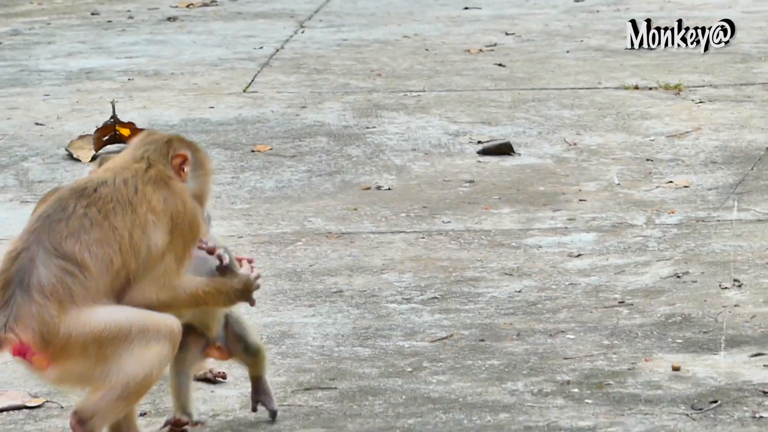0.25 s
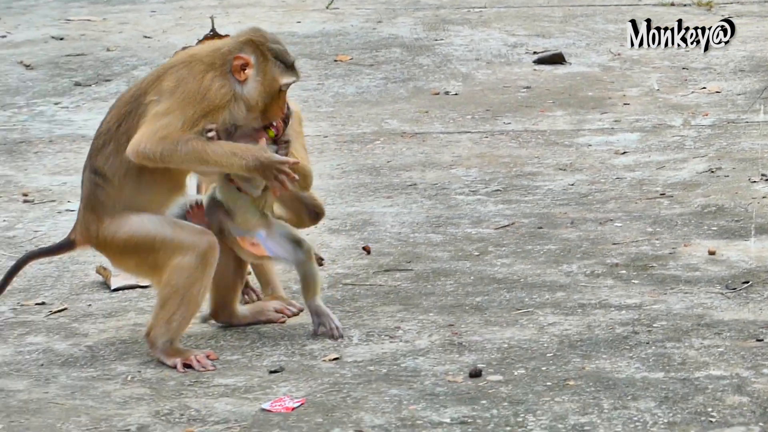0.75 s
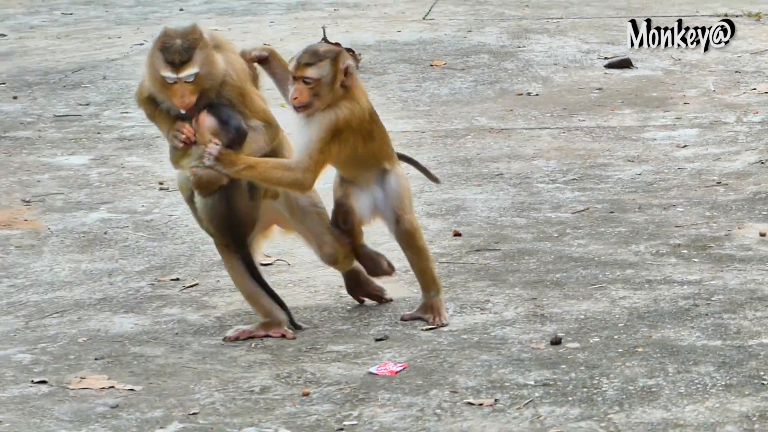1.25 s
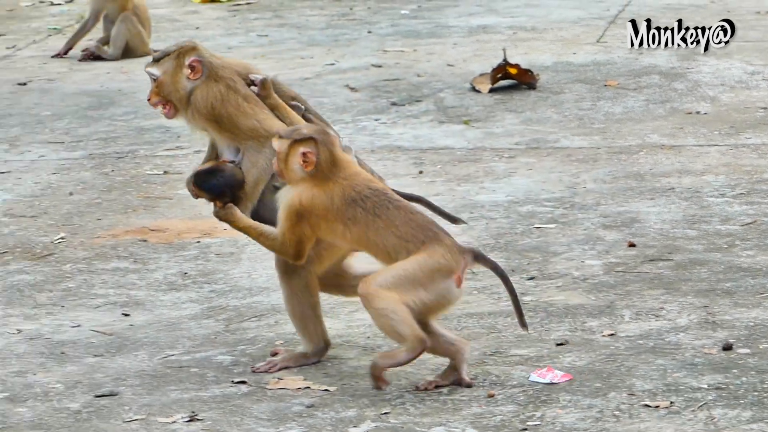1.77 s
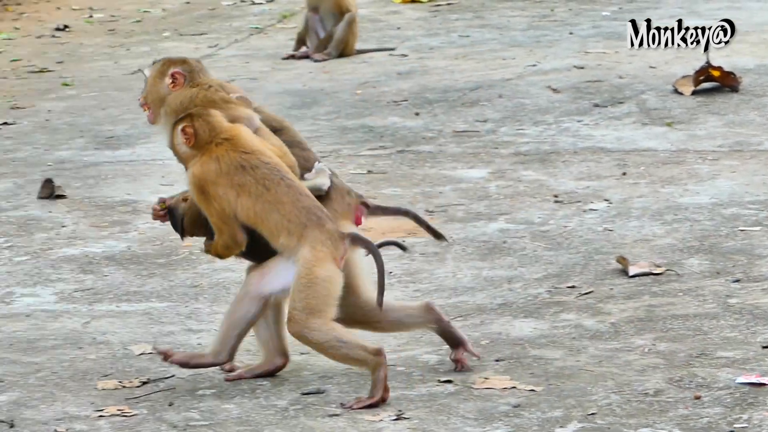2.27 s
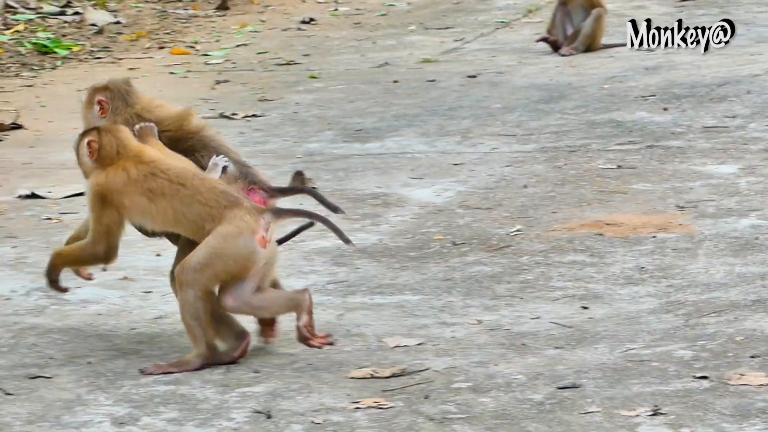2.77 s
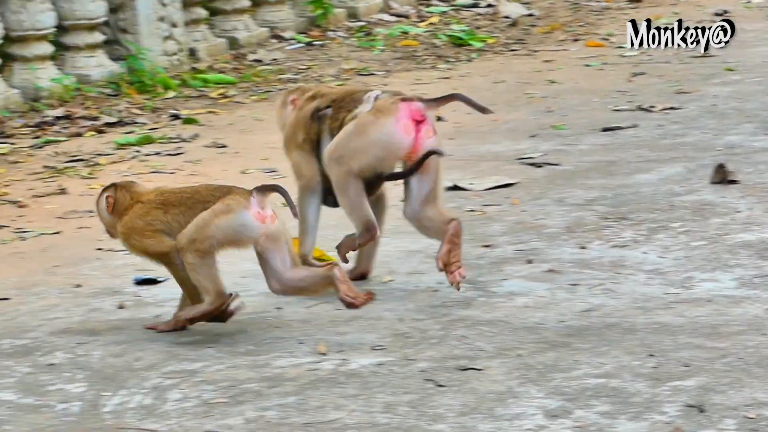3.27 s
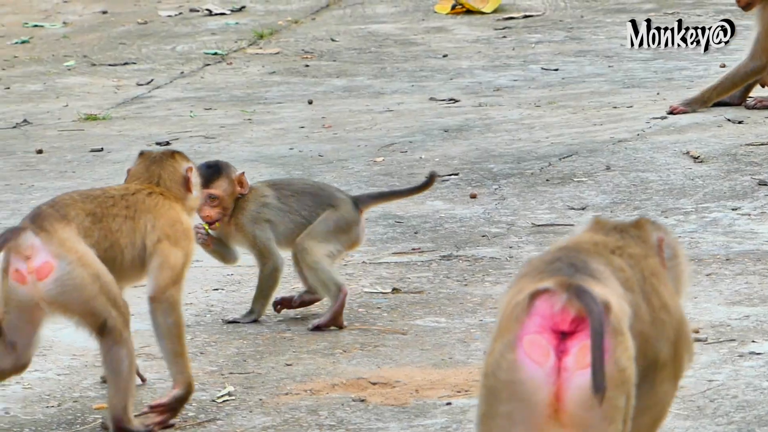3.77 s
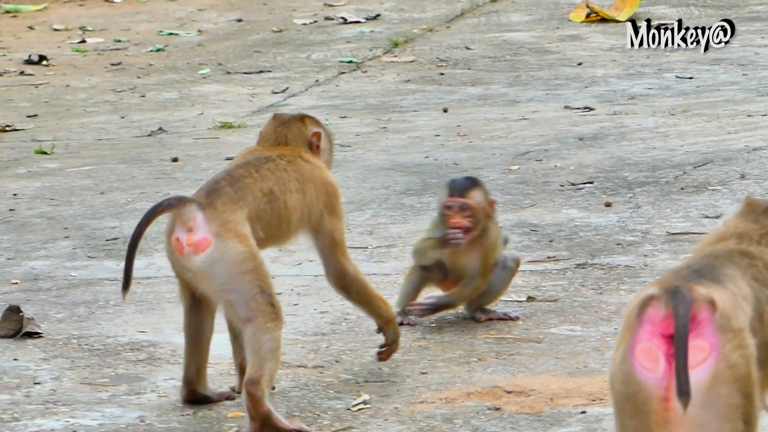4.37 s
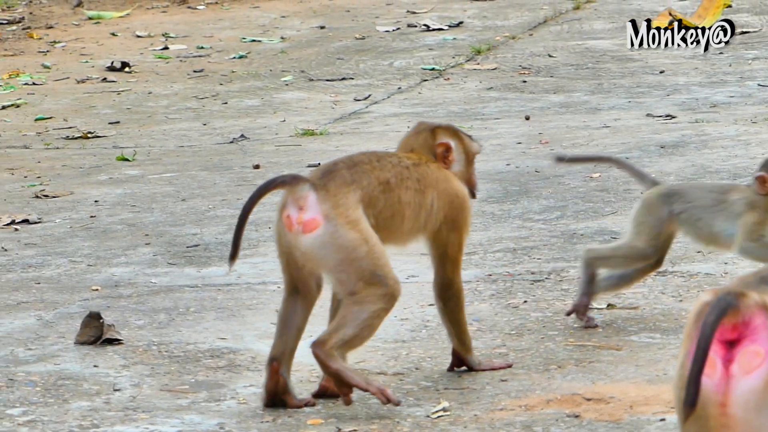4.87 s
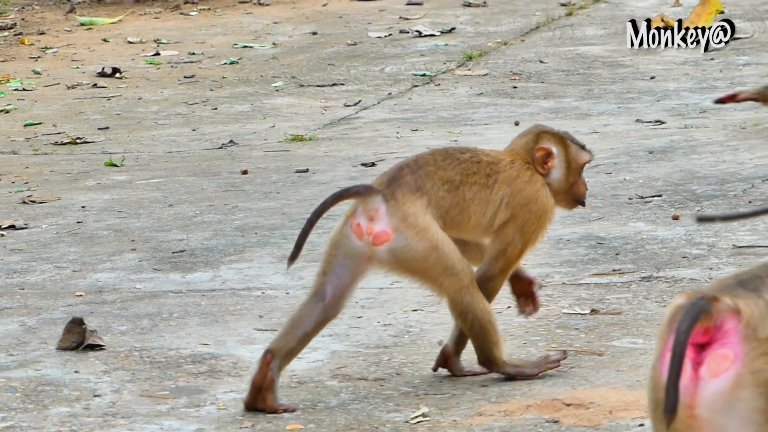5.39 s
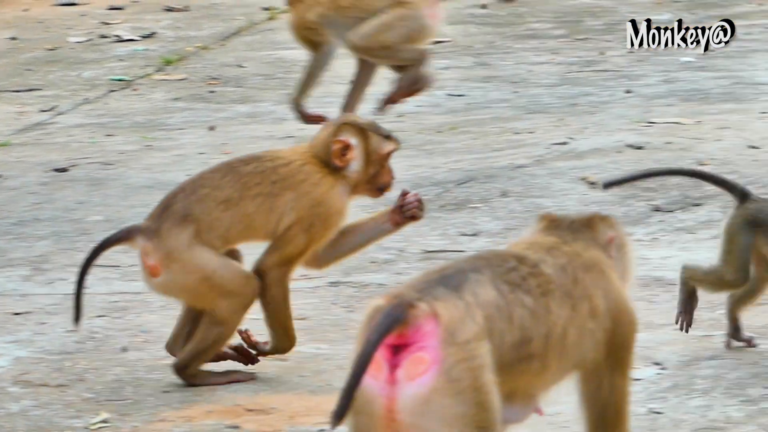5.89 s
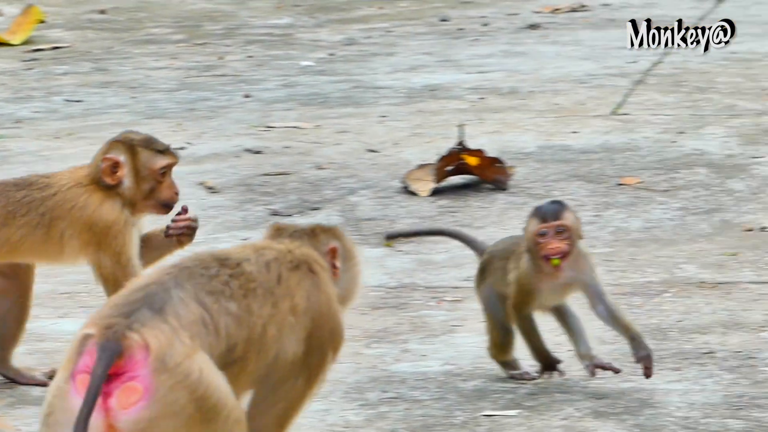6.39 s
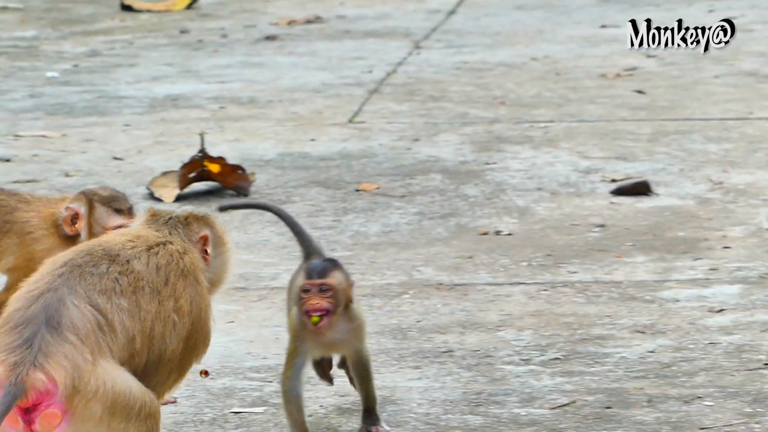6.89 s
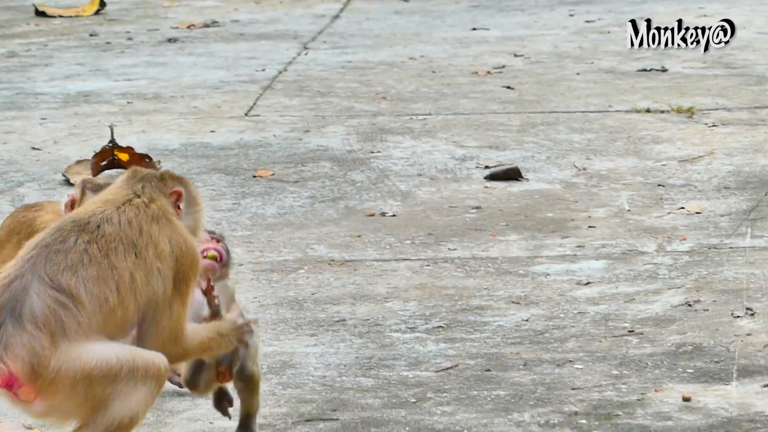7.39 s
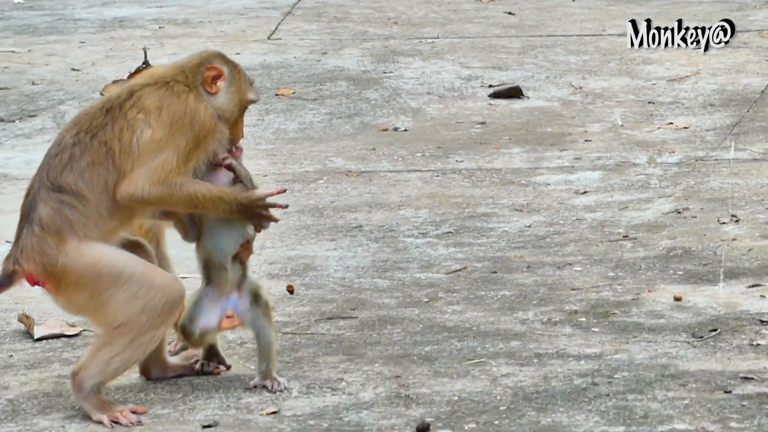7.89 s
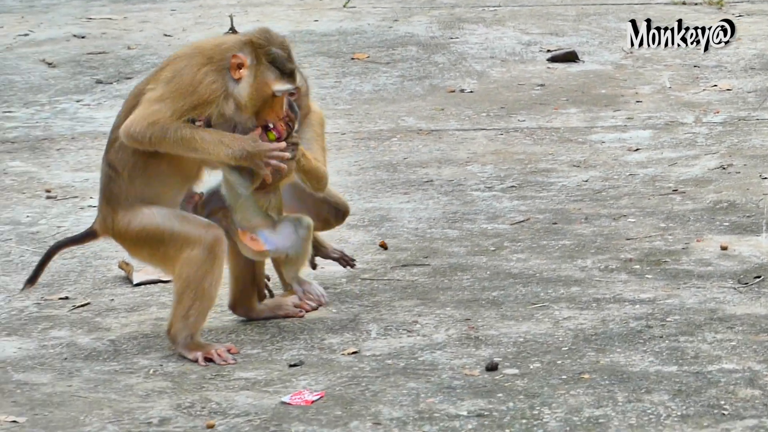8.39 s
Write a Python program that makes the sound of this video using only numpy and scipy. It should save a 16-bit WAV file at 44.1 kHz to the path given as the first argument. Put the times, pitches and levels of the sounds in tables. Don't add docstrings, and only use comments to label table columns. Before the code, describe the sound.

A small monkey screams on a paved yard with a short, patchy echo. Wind buffets the microphone with low thumps at 0-0.15 s, while a shrill scream bursts out at 0.1 and falls into rasp by 0.25. A thin high yelp follows at 0.8, a rough short scream at 1.0, a tiny chirp at 1.27 and a loud, hoarse, noisy scream at 1.3-1.5. Feet scuff and tap between 1.7 and 3.45, sharpest at 2.44; a faint far squeak comes at 2.15. Rumble, distant traffic, motor hum and insect hiss continue. At 3.54 everything becomes quieter, duller and slowed. A faint wavering squeal holds at 4.0-4.3, a double-arched one at 4.65-4.87, then soft scuffs near 5.1. The background calms further at 6.1; a clear squeal rises slightly and sinks at 6.7-6.9. From 7.14 the opening repeats slowed, softer and deeper: stretched scream at 7.3, yelp at 8.3, another scream from 8.6.

```python
import sys
import numpy as np
from scipy import signal
from scipy.fft import rfft, irfft
from scipy.io import wavfile
from scipy.ndimage import uniform_filter1d

SR = 44100
rng = np.random.default_rng(int(sys.argv[2]) if len(sys.argv) > 2 else 0)


def store_wav(level_fs):
    pcm = np.round(np.clip(np.atleast_2d(level_fs), -1, 1) * 32767)
    wavfile.write(sys.argv[1], SR, pcm.T.astype(np.int16))


def gain_from_db(level_db):
    decades = np.asarray(level_db, float) / 20
    return 10 ** decades


N = 381461
TIME, HZ = np.arange(N) / SR, np.arange(N // 2 + 1) * SR / N + 1e-3
SLOW = 2 / 3


def rms_one(x):
    return x / np.sqrt(np.mean(x ** 2) + 1e-20)


def at_hz(points, hz):
    x, y = np.array(points).T
    return np.interp(np.log(hz), np.log(x), y)


def drift(rate, size=N):
    r = np.exp(-2 * np.pi * rate / SR)
    settle = SR // 2
    noise = rng.standard_normal(size + settle)
    return rms_one(signal.lfilter([1], [1, -2 * r, r * r], noise)[settle:])


def resonance(x, hz, width_hz):
    r = np.exp(-np.pi * width_hz / SR)
    poles = [1, -2 * r * np.cos(2 * np.pi * hz / SR), r * r]
    return signal.lfilter((1 - r * r) / 2 * np.array([1, 0, -1]), poles, x)


# (frequency [Hz], correlation [0-1])
LIKENESS = [(60, 0.95), (120, 0.8), (250, 1), (510, 0.61), (1050, 0.22), (2150, 0.8), (4390, 0.76),
            (8990, 0.21)]
# (frequency [Hz], level [dB])
LEAN = [(60, 3), (100, -3), (180, -0.5), (320, -3), (560, -2.5), (970, -0.5), (1690, 0), (2950, 0.5),
        (5150, 1), (8990, 0.0)]
# (frequency [Hz], phase [rad])
LEAD = [(0, 0), (260, -0.92), (1120, 0.4), (1640, 0.085), (2150, 0.77), (3010, 0.0), (5000, -0.21),
        (5430, -0.2), (5860, 0.038), (6120, -0.3), (6370, 0.4), (7490, -0.38), (8010, 0.22), (9130, -0.0)]


def stereo_noise(gain, speed):
    mid, side = rfft(rng.standard_normal((2, N))) * gain
    hz = HZ / speed
    alike = np.clip(at_hz(LIKENESS, hz), 0, 1)
    lean = gain_from_db(at_hz(LEAN, hz) / 2)
    lean = lean * np.exp(.5j * at_hz(LEAD, hz))
    pair = np.sqrt(1 + alike) * mid + np.sqrt(1 - alike) * side * [[1], [-1]]
    return rms_one(irfft(pair * [lean, 1 / lean], N))


# (start [s], rumble [dB], traffic [dB], hiss [dB])
SHOTS = [
    (0, -48, -54.5, -57.5),
]
SLOW_SHOTS = [
    (3.54, -59, -63, -68),
    (6.1, -62, -71.5, -72),
]
# (time [s], level [dB], half width [s])
GUSTS = [
    (0, 17.5, 0.029),
    (.095, 15, 0.036),
    (.19, -8, 0.12),
    (.56, 4, 0.035),
    (2.23, 2.5, 0.14),
    (2.49, 7.5, 0.02),
    (2.769, 0, 0.042),
    (3.36, 4, .12),
]
SLOW_GUSTS = [
    (4.34, -3, 0.044),
    (4.7, 7, 0.048),
    (5.75, -3, 0.037),
    (6.03, 0.5, 0.096),
    (6.29, 2, .04),
    (6.68, 1.5, 0.085),
    (7.161, 7, 0.35),
]


def weather(shots, gusts):
    start, *levels = np.transpose(shots)
    shot = np.clip(np.searchsorted(start, TIME) - 1, 0, None)
    rumble_db, traffic_db, hiss_db = (level[shot] for level in levels)
    wind_db = sum(db * np.exp(-((TIME - at) / width) ** 2) for at, db, width in gusts)
    return rumble_db + wind_db, traffic_db + .15 * wind_db, hiss_db + .081 * wind_db


# (frequency [Hz], density [dB per Hz])
AIR_COLOUR = [(15, -41.5), (25, -21.5), (71, 0), (182, -2.5), (307, -10), (393, -9), (808, -16),
              (938, -13.5), (1090, -16.5), (1170, -15.5), (2870, -22.5), (3860, -22), (4590, -28),
              (6500, -25), (9440, -34.5), (12300, -59), (20800, -120)]


def air(levels, speed, hum_db, insect_db):
    hz = HZ / speed
    insects = np.exp(-((hz - 6500) / 450) ** 2)
    motor = np.exp(-((hz - 180.3) / 7.8) ** 2)
    out = gain_from_db(insect_db) * stereo_noise(insects, speed)
    out += gain_from_db(hum_db) * stereo_noise(motor, speed)
    low, high = 1 / (1 + (hz / 240) ** 6), 1 / (1 + (720 / hz) ** 6)
    shares = low, 1 - low - high, high
    for share, level_db, gust_db in zip(shares, levels, (1.5, .8, .6)):
        colour = gain_from_db(at_hz(AIR_COLOUR, hz)) * np.sqrt(np.clip(share, 0, 1))
        out += gain_from_db(level_db + gust_db * drift(12.0)) * stereo_noise(colour, speed)
    return out


# (time [s], peak level [dB], ring frequency [Hz])
KNOCKS = [
    (0.0, -33, 61),
    (0.05, -26.5, 96),
    (0.074, -20.5, 125.7),
    (0.097, -21, 138),
    (0.112, -27.5, 102),
    (3.341, -34, 83.3),
    (3.453, -28.5, 107),
]
SLOW_KNOCKS = [
    (7.005, -45.5, 74),
    (7.029, -39, 40.4),
    (7.109, -47, 61.7),
    (7.124, -32.5, 56.5),
]


def knocks(rows):
    out, t = np.zeros(N), TIME[:SR // 10]
    for s, peak_db, hz in rows:
        swing = np.sin(2 * np.pi * hz * t) * np.exp(-(t * hz / 0.69) ** 2)
        out[round(s * SR):][:len(t)] += gain_from_db(peak_db + 3.5) * swing
    out = signal.sosfilt(signal.butter(2, 55.0, "high", fs=SR, output="sos"), out)
    later = np.interp(TIME - .0012, TIME, out)
    return np.array([out, later]) * gain_from_db([[-1.5], [1.5]])


# (time [s], peak level [dB], centre frequency [Hz],
# t60 [s])
STEPS = [(.946, -43, 3400, 0.048), (1.69, -36, 6950, 0.016), (1.7, -38, 7000, 0.14),
         (2.1, -38.5, 500, 0.33), (2.441, -26.5, 1383, 0.04), (2.454, -37, 6500, 0.055),
         (2.917, -40, 945, 0.092), (2.98, -38, 7000, 0.075), (2.997, -34, 6500, 0.19),
         (3.144, -32.5, 2730, 0.036), (3.21, -38, 5000, 0.082), (3.23, -40, 3880, 0.18),
         (3.45, -44, 5540, 0.23)]
SLOW_STEPS = [
    (5.075, -53, 2260, .05),
    (5.15, -47, 450, .1),
    (5.174, -45, 2310, .06),
]


def steps(rows):
    out, t = np.zeros((2, N)), TIME[:SR // 4]
    for s, peak_db, hz, t60 in rows:
        grains = rng.standard_normal((2, len(t))) + 1.4 * rng.standard_normal(len(t))
        grit = rms_one(resonance(grains, hz, 0.63 * hz))
        envelope = gain_from_db(peak_db - 13.0 - 60 * t / t60) * np.clip(t / 0.0022, 0, 1)
        out[:, round(s * SR):][:, :len(t)] += envelope * grit
    return out


# (frequency [Hz], t60 [s])
YARD = [(1000, 0.7), (2500, 0.85), (5000, 0.65), (9000, 0.57)]


def yard(x, speed):
    t, echo = TIME[:2 * SR] * speed, 0
    noise = stereo_noise(1 + 0 * HZ, speed)[:, :2 * SR]
    edges = 700 * 2 ** np.arange(0, 4.1, .5)
    for low, high in zip(edges, edges[1:]):
        half_octave = signal.butter(2, [low * speed, high * speed], "band", fs=SR, output="sos")
        t60 = at_hz(YARD, np.sqrt(low * high))
        echo = echo + signal.sosfilt(half_octave, noise) * gain_from_db(-60 * t / t60)
    wall_db = 1.7 * np.exp(-((t - .055) / 0.051) ** 2)
    patchy_db = 2.1 * drift(25.0, len(t))
    echo = echo * np.clip(t / 0.0049, 0, 1) * gain_from_db(wall_db + patchy_db)
    echo = echo / np.sqrt(np.sum(echo ** 2) / 2)
    return signal.fftconvolve(x[None], echo, axes=1)[:, :N]


# (pitch at full speed [Hz], lift [dB])
UNDERTONE = [(2050, 6.5), (2400, 6.5), (2750, -0.5), (3000, -8.5), (3400, -12)]


def voicing(rows, octave_db, quarter_db, speed, t):
    s, *columns = np.transpose(rows)
    pitch, effort_db, disorder_db = (np.interp(t, s, c) for c in columns)
    whistle_db = effort_db - 10 * np.log10(1 + 10 ** (disorder_db / 10))
    rasp_db = whistle_db + disorder_db
    age = (t - t[0]) * speed
    octave_db = whistle_db + octave_db - 11 * np.exp(-age / .01) - 9.5 * gain_from_db(2 * (rasp_db - effort_db))
    quarter_db = rasp_db + quarter_db - 16 * np.exp(-age / .024)
    before_top = np.arange(len(t)) < np.argmax(pitch)
    slack_hz = np.where(before_top, pitch.max(), pitch) / speed
    return pitch, whistle_db, octave_db, quarter_db, rasp_db, at_hz(UNDERTONE, slack_hz)


# (frequency [Hz], gain [dB])
THROAT = [(900, -36), (1200, -17), (1450, -15), (1750, -3), (2100, -5.5), (2500, -3.5), (2900, -2),
          (3300, -5), (4000, -13), (5600, -11.5), (7400, -16), (8300, -21.5), (9000, -33.5), (9600, -26)]


def squeal(rows, octave_db, quarter_db, speed):
    t = TIME[round(rows[0][0] * SR):round(rows[-1][0] * SR)]
    voices = voicing(rows, octave_db, quarter_db, speed, t)
    pitch, whistle_db, octave_db, quarter_db, rasp_db, under_db = voices

    def wander(rate):
        return drift(rate * speed, len(t))

    unrest = gain_from_db(np.clip(rasp_db - 2 - whistle_db, -40, 0))
    pitch = uniform_filter1d(pitch, round(.009 * SR / speed), mode="nearest")
    wobble = (.002 + .036 * unrest) * wander(220.0)
    phase = 2 * np.pi * np.cumsum(pitch * (1 + wobble)) / SR
    shake_db = (.6 + 2.8 * unrest) * wander(90.0)
    out = gain_from_db(whistle_db + shake_db) * np.sin(phase)
    third_db = 8.0 + 1.2 * at_hz(THROAT, 3 * pitch / speed)
    octave = np.sin(2 * phase + 5.0 * unrest ** 1.5 * wander(100.0))
    twelfth = gain_from_db(third_db) * np.sin(3 * phase)
    out += gain_from_db(octave_db + 1.5 * shake_db) * (octave + twelfth)
    effort = gain_from_db(.8 * wander(200.0))
    for k in range(2, 18):
        whole, half = k % 4 == 0, k % 4 == 2
        colour_db = at_hz(THROAT, pitch / speed * k / 4) + under_db * (k < 4) - 20.0 * (k == 2)
        colour_db = colour_db + 3.8 * (1 - unrest) * half
        slip = (.065 + .11 * unrest) * k * wander(110.0)
        line = gain_from_db(quarter_db + 3.4 * wander(61.0)) * np.sin(phase * k / 4 + slip) * (not whole)
        smear = wander(330.0) * np.sin(phase * k / 4) + wander(330.0) * np.cos(phase * k / 4)
        smear_db = rasp_db - 13.0 - 6.2 * (4.5 - unrest) * whole
        out += gain_from_db(colour_db) * (line + gain_from_db(smear_db) * effort * smear)
    edge = np.clip(np.minimum(t - t[0], t[-1] - t) / 0.0018, 0, 1)
    low_cut = signal.butter(6, 1525.0 * speed, "high", fs=SR, output="sos")
    return np.sqrt(2) * signal.sosfilt(low_cut, out) * edge


# (time [s], pitch [Hz], effort [dB], disorder as rasp over whistle [dB])
FALLING_SCREAM = [(.088, 2106, -40, -13), (.101, 2360, -27.5, -15), (.108, 2575, -22.5, -15),
                  (.114, 2940, -19.5, -11), (.14, 2966, -25.5, 0), (.175, 2770, -31, -2.5),
                  (.225, 2280, -37, -4), (.238, 2056, -33, -2.5), (.25, 1933, -50.5, -4.5)]
HIGH_YELP = [(.765, 3300, -49, -24), (.775, 3373, -31.5, -29.5), (.797, 3540, -33, -23.5),
             (.806, 3440, -28, -8), (.822, 3370, -31.5, -2.5), (.834, 3106, -26, -11.5),
             (.86, 3085, -35.5, -7.5), (.89, 3030, -46.5, -11.5)]
SHORT_SCREAM = [(.97, 2450, -40.5, -7.5), (.982, 3003, -28, -14), (1.0, 3038, -25.5, -7.5),
                (1.01, 3015, -23, -1.5), (1.025, 2913, -23.5, 4), (1.04, 2715, -27.5, 9.5),
                (1.055, 2402, -32, 5.5), (1.075, 2450, -35.5, -1), (1.1, 2364, -41.5, -2.5)]
CHIRP = [(1.262, 2950, -45, -14), (1.27, 2834, -46, -24), (1.285, 2960, -33, -14)]
HOARSE_SCREAM = [(1.279, 2900, -50, 4), (1.292, 3170, -23, 15), (1.31, 2657, -19, 19),
                 (1.35, 2292, -25, 22), (1.39, 2455, -25.5, 16), (1.425, 2356, -25, 10),
                 (1.455, 2456, -25, 7.3), (1.49, 2486, -47, 16)]
FAR_SQUEAK = [(2.144, 2670, -45.5, -24), (2.17, 2746, -45, -7), (2.19, 2674, -40, -16),
              (2.205, 2354, -46, -5), (2.215, 2030, -47.5, 3), (2.235, 2020, -54, -23)]
WAVERING_HOLD = [(4.015, 2110, -58.5, 1), (4.036, 2083, -66.5, 0.5), (4.044, 2164, -44.5, -16),
                 (4.09, 2044, -41, -15), (4.125, 2010, -42.5, -17.5), (4.165, 2103, -44, -16.5),
                 (4.21, 2164, -47.5, -16), (4.27, 2120, -40.5, -21), (4.305, 2068, -49.5, -8.5)]
DOUBLE_ARCH = [(4.652, 2030, -46, -16), (4.668, 2297, -36.5, -25.5), (4.695, 2390, -46.5, -17.5),
               (4.73, 2337, -38, -12), (4.757, 2234, -37.5, -17.5), (4.775, 2385, -64, -3.5),
               (4.795, 2410, -45.5, -7.5), (4.83, 2326, -41.5, -14.5), (4.87, 2287, -55.5, -14)]
CLEAR_ARCH = [(6.708, 1958, -55, -19.5), (6.718, 2112, -41, -20), (6.75, 2286, -36, -31),
              (6.79, 2199, -33, -28.5), (6.825, 2191, -34.5, -28), (6.87, 2072, -36.5, -29.5),
              (6.905, 1965, -37, -25.5), (6.925, 1853, -53.5, -13)]
# (course, octave over whistle [dB], quarter lines over rasp [dB],
# echo over direct [dB], more when far or turned away)
SQUEALS = [(FALLING_SCREAM, -14, 2.3, -5), (HIGH_YELP, -15.5, 8.1, -11.5), (SHORT_SCREAM, -5, -3, -11.5),
           (CHIRP, 0, -15, 4), (HOARSE_SCREAM, -5, -16, -5), (FAR_SQUEAK, -13.5, -30, 4.4)]
SLOW_SQUEALS = [(WAVERING_HOLD, -8.5, -6, -7), (DOUBLE_ARCH, -7, -10, -10), (CLEAR_ARCH, -13, -21.5, -15)]


def monkey(calls, speed):
    voice, sent = np.zeros((2, N))
    for rows, octave_db, quarter_db, echo_db in calls:
        sound = squeal(rows, octave_db, quarter_db, speed)
        start = round(rows[0][0] * SR)
        voice[start:start + len(sound)] += sound
        sent[start:start + len(sound)] += gain_from_db(echo_db) * sound
    lag = np.exp(1j * np.pi * HZ * 1.2e-5 / speed * np.array([[1], [-1]]))
    direct = irfft(rfft(voice) * lag, N) * gain_from_db([[-.2], [.2]])
    return direct + yard(sent, speed)


def band_limit(x, speed):
    return irfft(rfft(x) * np.clip((9600 * speed - HZ) / 120, 0, 1), N)


def scene():
    cut, repeat = round(3.54 * SR), round(7.13975 * SR)
    repeat_db = -11.9
    slow_voice = monkey(SLOW_SQUEALS, SLOW)
    slow = slow_voice + air(weather(SLOW_SHOTS, SLOW_GUSTS), SLOW, hum_db=-62.5, insect_db=-89.5)
    slow += steps(SLOW_STEPS) + knocks(SLOW_KNOCKS)
    fast = monkey(SQUEALS, 0.97) + air(weather(SHOTS, GUSTS), 1, hum_db=-56, insect_db=-76.5)
    fast += steps(STEPS) + knocks(KNOCKS)
    tail = signal.resample_poly(slow_voice[:, repeat:], 2, 3, axis=1)
    fast[:, :tail.shape[1]] += tail / gain_from_db(repeat_db)
    out = band_limit(fast, 0.98)
    again = signal.resample_poly(out[:, :SR + SR // 10], 3, 2, axis=1)
    out[:, cut:] = band_limit(slow, SLOW)[:, cut:]
    blend = np.clip(TIME[:N - repeat] / .012, 0, 1)
    out[:, repeat:] += blend * (gain_from_db(repeat_db) * again[:, :N - repeat] - out[:, repeat:])
    return out


def roll_off(x):
    return signal.sosfilt(signal.butter(12, 9590, fs=SR, output="sos"), x)


def record(dry):
    return roll_off(dry)


dry = scene()
out = record(dry)
store_wav(out)
```